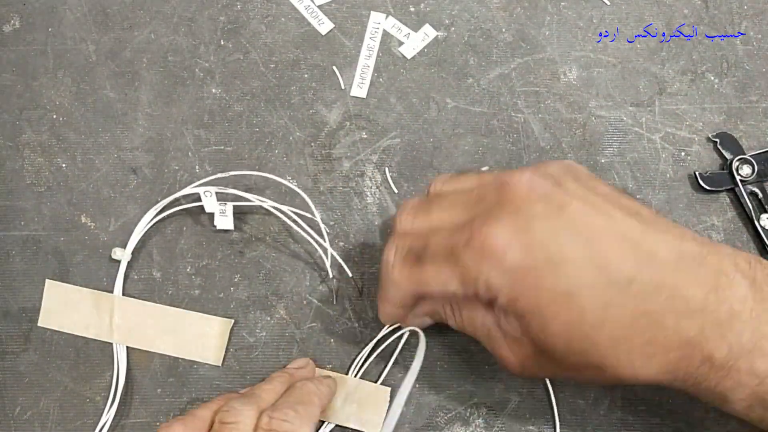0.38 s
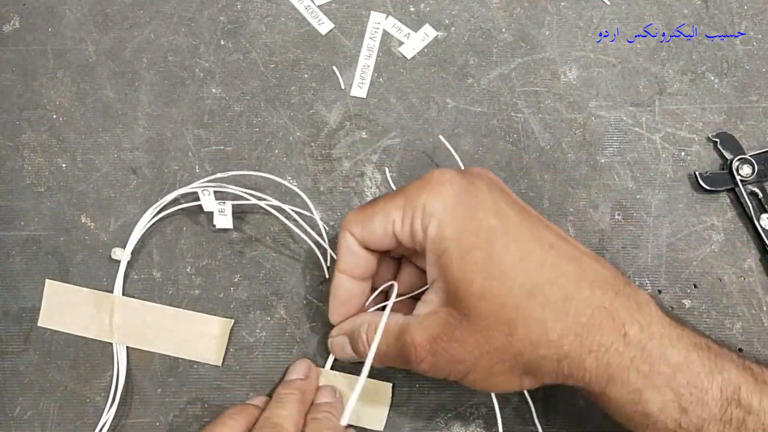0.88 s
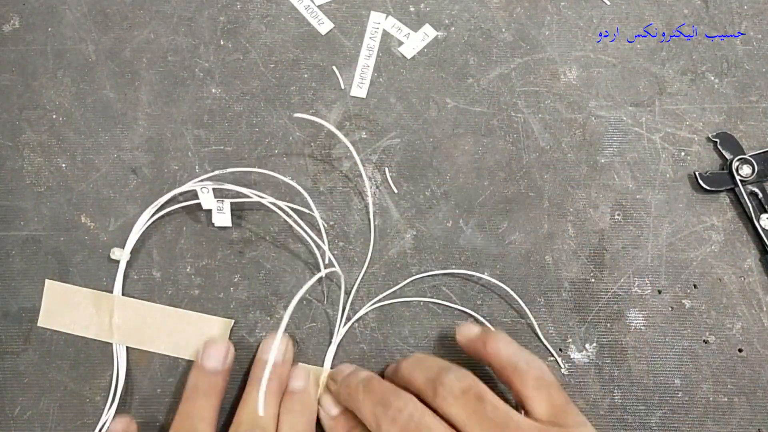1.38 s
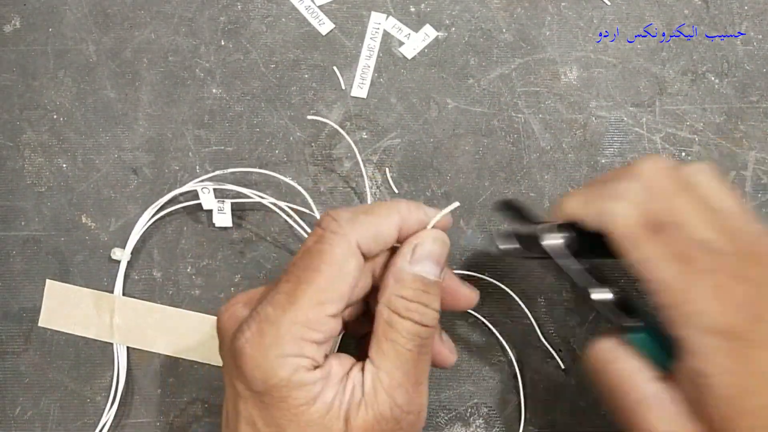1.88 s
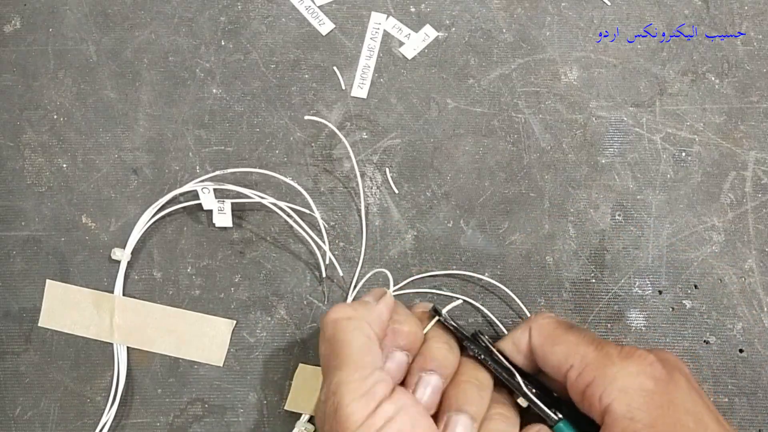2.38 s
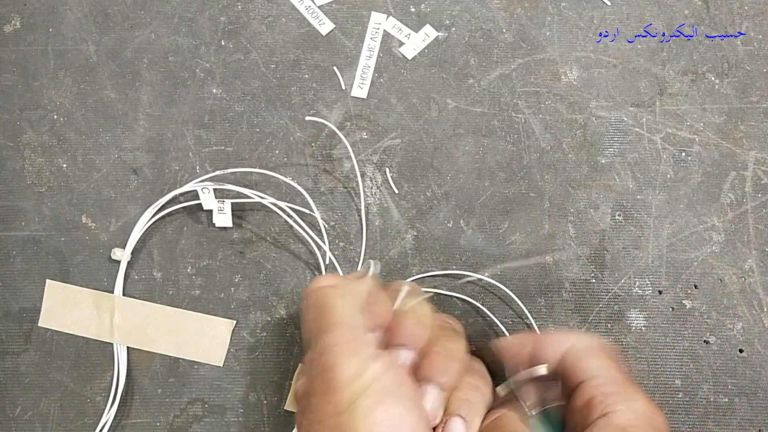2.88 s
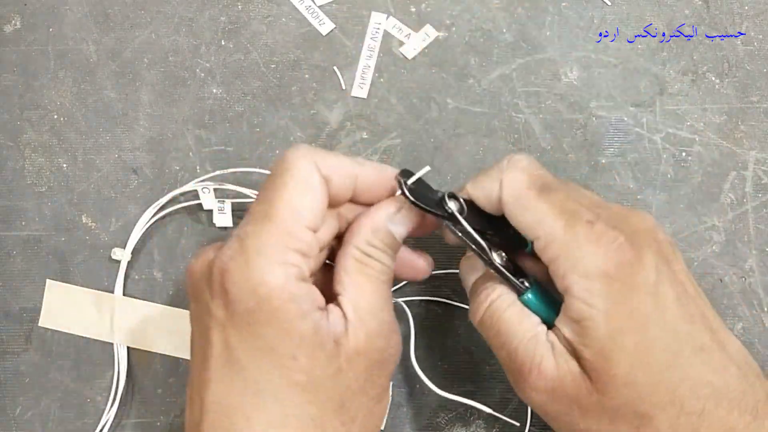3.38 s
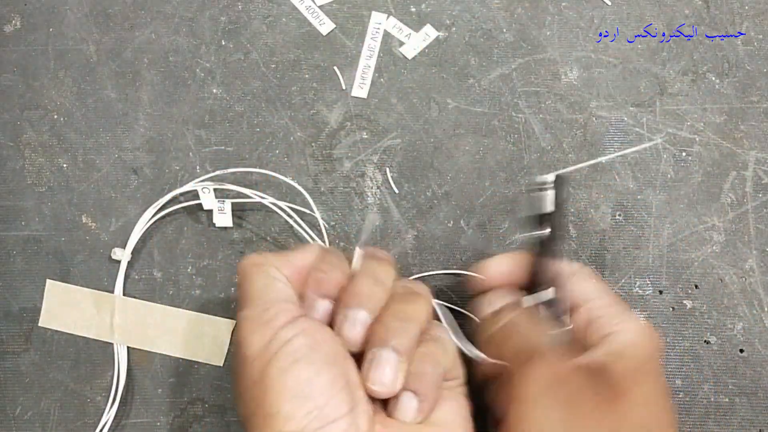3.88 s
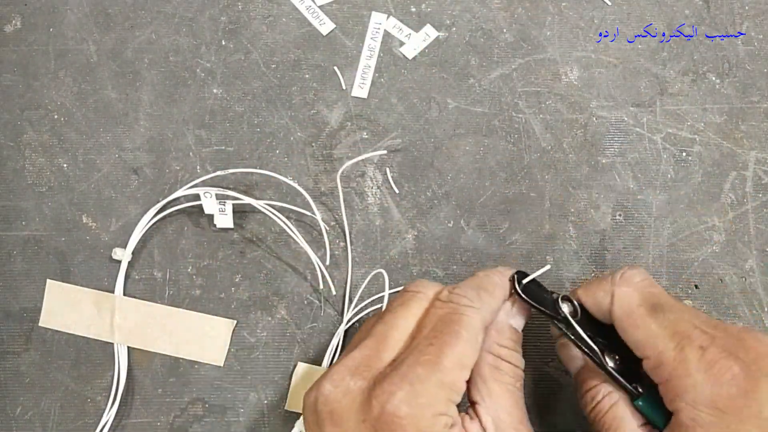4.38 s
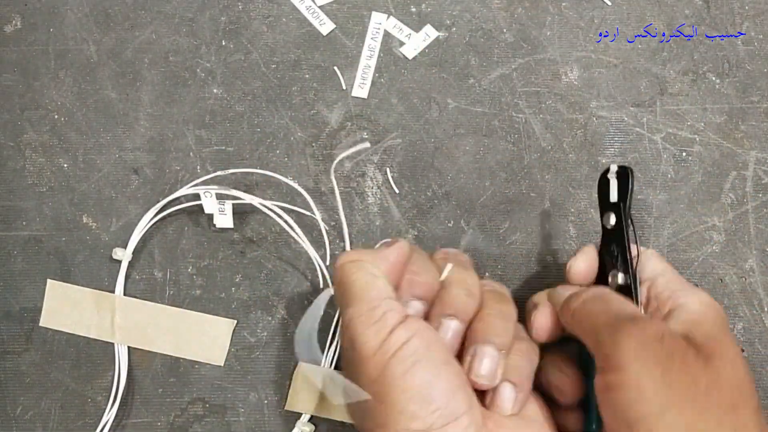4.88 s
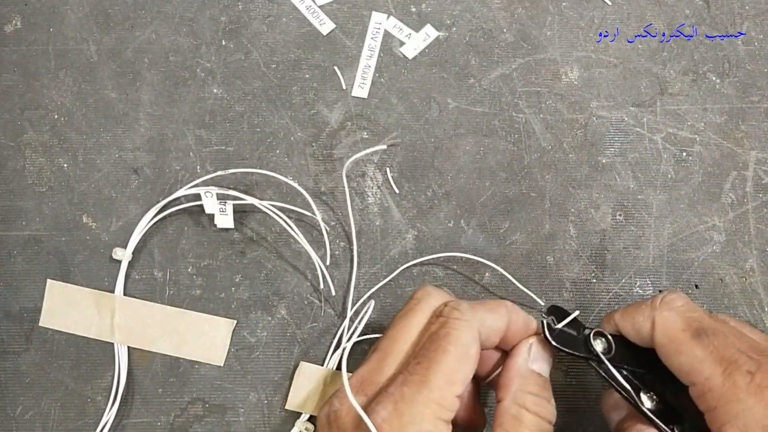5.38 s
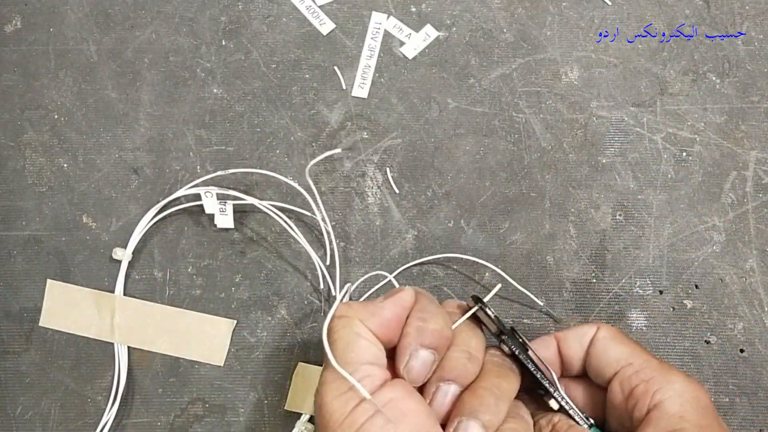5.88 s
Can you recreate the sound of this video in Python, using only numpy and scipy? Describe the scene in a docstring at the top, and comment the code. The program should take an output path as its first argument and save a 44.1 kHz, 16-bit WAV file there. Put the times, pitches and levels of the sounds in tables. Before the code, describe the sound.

A pliers-like tool clacks onto a bench, fingers rustle and tick through thin wires, then four sharp metallic snaps strip their ends.

```python
"""Stripping wires at a workbench

A hand tool is laid down on a bench; fingers sort thin coated wires, then the steel jaws strip four wire ends.
Wires tick and scrape (noise through resonances), tool and hands knock the bench top (clusters of modes), the
closed jaws drag on sleeves (fuzzy gliding lines) and tear them off (steel modes and a crack), over quiet room noise.
Everything runs faster than life: each contact is smeared into a short swell, differently in the two channels."""
import sys
import numpy as np
from scipy import signal
from scipy.fft import rfft, irfft, next_fast_len
from scipy.io import wavfile
from scipy.ndimage import uniform_filter1d, map_coordinates

SR = 44100
rng = np.random.default_rng(int(sys.argv[2]) if len(sys.argv) > 2 else 0)


def pcm_store(signal):
    """Save signal as 16-bit PCM."""
    levels = np.round(np.clip(np.atleast_2d(signal), -1, 1) * 32767)
    wavfile.write(sys.argv[1], SR, levels.astype(np.int16).T)


def voltage_ratio(decibels):
    """Convert decibels (scalar or array-like) to amplitude ratios, 20 dB per decade."""
    exponent = np.asarray(decibels, float) / 20
    return 10 ** exponent


N = 265129

# noise of the handling: t/s, wire rustle level/dB before band trims, low background level/dB before its overall trim
HANDLING = [(0.0, -57, -62), (0.18, -71, -57.5), (0.4, -60.5, -57.5), (0.7, -86, -61), (1.14, -61.5, -60.5),
            (1.4, -69.5, -53.5), (1.68, -72.5, -63.5), (1.89, -82, -57), (2.01, -75, -63),
            (2.95, -76.5, -61), (3.11, -65, -60), (3.28, -82, -62.5), (4.0, -78.5, -61.5),
            (4.5, -77.5, -63), (4.97, -67, -61.5), (5.22, -67.5, -61), (5.33, -99, -62.5), (5.6, -71, -61),
            (6.01, -74, -62)]

LEAD = SR // 20  # samples of a swell before its top
AROUND = (np.arange(3 * LEAD) - LEAD) / SR  # seconds from the top of a swell


def unit(x):
    """Scaled to rms 1."""
    return x / np.sqrt(np.mean(x ** 2) + 1e-20)


def wobble(rate):
    """A smooth random curve for each channel, rate knots a second."""
    knots = rng.standard_normal((2, int(N * rate / SR) + 4))
    position = np.arange(N) * rate / SR
    return np.array([map_coordinates(k, [position]) for k in knots])


def filtered(x, response):
    """x shaped in the spectrum by a complex response of frequency in Hz."""
    m = next_fast_len(N + SR // 2)
    return irfft(rfft(x, m) * response(np.fft.rfftfreq(m, 1 / SR)), m)[..., :N]


def resonant(x, modes):
    """x through parallel resonances of alternating sign, at unchanged power for white noise."""
    def ring(f):
        total = 0
        for k, (centre, width, db) in enumerate(modes):
            resonance = 1j * f * width / (centre * centre - f * f + 1j * f * width)
            total = total + (-1) ** k * voltage_ratio(db) * resonance
        return total

    return filtered(x, lambda f: ring(f) / np.sqrt(np.mean(abs(ring(f)) ** 2)))


def grit(rough_db, rate):
    """Uneven noise of rms 1, unrelated between the channels."""
    return unit(rng.standard_normal((2, N)) * voltage_ratio(rough_db * wobble(rate)))


def swell(db, pan_db, rise, fall, lead=1.78, tail=1.22):
    """Stereo envelope of one contact: rise and fall in seconds, lead and tail bend the slopes."""
    shape = np.where(AROUND < 0, abs(AROUND / rise) ** lead, abs(AROUND / fall) ** tail)
    return voltage_ratio(db) * np.exp(-shape / 2) * voltage_ratio([[pan_db / 2], [-pan_db / 2]])


def laid(times, pieces):
    """Sum of the pieces, each with its top at its time."""
    out = np.zeros((2, N + 4 * LEAD))
    for s, piece in zip(times, pieces):
        out[:, round(s * SR):][:, :3 * LEAD] += piece
    return out[:, LEAD:N + LEAD]


def struck(blows, modes, spread, detune, apart, apart_hz):
    """Each blow rings the modes near its centre; the channels differ more in phase towards the high modes."""
    hz, mode_db = np.repeat(np.transpose(modes), 6, axis=1)  # every mode is a cluster of close partials
    chance = rng.standard_normal((len(blows), 4, len(hz)))
    pieces = []
    for (_, db, centre_hz, pan, rise, fall), (size, phase, side, off) in zip(blows, chance):
        distance = np.log(hz / centre_hz) / spread
        weight = voltage_ratio(mode_db + 1.3 * size) * np.exp(-distance ** 2 / 2)
        near = weight > 0.03 * weight.max()
        shape = swell(db, pan, rise, fall, lead=1.97, tail=0.98)
        live = shape[0] > 1e-3 * shape[0].max()
        partial_hz = (hz * (1 + detune * off))[near, None]
        angle = 2 * np.pi * partial_hz * AROUND[live] + 9 * phase[near, None]
        shift = (side * (apart + (hz / apart_hz) ** 2))[near, None]
        rings = np.zeros_like(shape)
        rings[:, live] = weight[near] @ np.sin(angle + shift), weight[near] @ np.sin(angle - shift)
        # the blow keeps its level however the partials beat
        loudness = np.linalg.norm(rings * shape, axis=1) / np.linalg.norm(shape, axis=1)
        pieces.append(rings * shape / loudness[:, None])
    return laid([row[0] for row in blows], pieces)


def workshop():
    """Diffuse background noise that swells and sinks with the handling, a little stronger right in the bass."""
    # colour of the room: f/Hz, relative density/dB per Hz
    room = [(15, -61), (25, -23.5), (97, -2.5), (161, -5.5), (195, 1.5), (236, -10), (309, -6),
            (818, -11.5), (911, -9), (1130, -12.5), (2050, -19.5), (2550, -22), (3520, -23), (4490, -26),
            (16000, -37.5)]
    at, _, room_db = np.transpose(HANDLING)
    f, db = np.transpose(room)

    def colour(hz):
        lean_db = np.array([[-1.2], [1.2]]) / (1 + (hz / 1200) ** 2)
        return voltage_ratio(np.interp(np.log(hz + 1), np.log(f + 1), db) + lean_db)

    noise = unit(filtered(grit(0.82, 30), colour))
    return noise * voltage_ratio(np.interp(np.arange(N) / SR, at, room_db) + 1.5)


def bench():
    """Soft blows ring the board's modes as thud, knock and tap; low modes reach both channels nearly alike."""
    # the tool lands and rocks to rest: t/s, knock level/dB, knock centre f/Hz, thud/dB and tap/dB over the knock
    landing = [(.212, -45.5, 517, -6, 1), (.228, -17, 660, -12, -12.5), (.224, -40, 302, 2.5, -10),
               (.243, -30, 600, -7, -3), (.259, -36.5, 440, 0.5, 3.5), (.275, -38, 350, -5, -6)]
    # hands on the bench: t/s, knock level/dB, knock centre f/Hz, thud/dB and tap/dB over the knock
    knocks = [(.029, -63.5, 434, 13, 4), (.128, -57, 550, -8, -2), (.403, -51.5, 405, -5, -9),
              (.525, -56.5, 400, -9, -9), (.707, -63.5, 560, 6.5, -7), (1.08, -59, 484, -4, 2),
              (1.204, -47.5, 514, -1, -4.5), (1.306, -51.5, 390, -7, -6), (1.34, -46, 447, -5, 0),
              (1.375, -51.5, 855, -19, -4), (1.409, -45, 1060, -11, -3.5), (1.432, -64, 400, 11, -8),
              (1.45, -50, 590, -12, -8), (1.513, -57, 420, 3, -15), (1.572, -54.5, 500, 1.5, -12),
              (1.782, -66, 326, 17, -15), (1.815, -72, 310, 13, -13), (1.855, -60, 410, 10, -8),
              (1.872, -46, 545, -10, -14), (2.953, -59.5, 280, 9.5, -8), (2.967, -50, 440, -7, -13),
              (3.963, -57, 350, 11, 1.5), (4.137, -59.5, 448, 1, -8), (4.573, -58, 450, -0.5, -1),
              (4.925, -53, 440, -0.5, -8), (5.984, -51, 390, 4.5, -6), (6.0, -63, 473, 15, -4)]
    # light, hard taps: t/s, level/dB, centre f/Hz
    taps = [(.625, -58.5, 1270), (.764, -57, 1720), (.806, -51.5, 1790), (.865, -58, 1510),
            (3.895, -56, 1820), (5.758, -61.5, 2270), (5.833, -57, 1640), (5.941, -58, 1900)]
    # modes of the bench top: f/Hz, relative level/dB
    board = [(48, -6), (66, -8), (88, 5), (125, -1), (158, -0.5), (215, 4), (345, 1.5), (400, 1),
             (480, -0.5), (540, -1.5), (600, 0), (740, 3), (880, 2.5), (1040, 1), (1190, 0.5), (1355, 1.5),
             (1490, 1.5), (1730, 2), (1900, 0.5), (2100, 2), (2350, 1.5), (2650, -6), (3000, -21)]
    thud_ratio, tap_ratio = 0.32, 2.6  # centres of thud and tap over that of the knock
    thud_late_s = 0.00393  # the thud swells later
    rise_s, fall_s, longer_low = 0.0073, 0.008, 0.2  # of a light tap at 500 Hz; power by which low blows last longer
    tool_pan_db, hands_pan_db = 0.5, -3.5  # left over right

    def parts(rows):
        blows = []
        for s, db, hz, thud_db, tap_db in rows:
            blows.append((s + thud_late_s, db + thud_db, thud_ratio * hz))
            blows.append((s, db, hz))
            blows.append((s, db + tap_db, tap_ratio * hz))
        return blows

    def shaped(rows, pan_db, duration):
        blows = []
        for s, db, hz in rows:
            stretch = duration * (500 / hz) ** longer_low
            blows.append((s, db, hz, pan_db, stretch * rise_s, stretch * fall_s))
        return blows

    tool = shaped(parts(landing), tool_pan_db, 0.64)  # a hard contact is quicker than a hand
    hands = shaped(parts(knocks), hands_pan_db, 0.94)
    light = shaped(taps, hands_pan_db, 1)
    return struck(tool + hands + light, board, spread=0.36, detune=0.0713, apart=0.49, apart_hz=1296)


def wires():
    """Scrapes and chance ticks over a grainy rustle excite the bright wires; each rustle band flickers by itself."""
    # clear brushes and flicks: t/s, top band level/dB, body/dB and air/dB over the top band, length/s
    clear = [(.009, -51.5, -6.5, -3, .005), (0.051, -55, -4, -10, 0.016), (.136, -42, -10.5, -13, .006),
             (0.167, -33.5, -10.5, -19, 0.0055), (0.196, -48.5, -1.5, -23, 0.0095),
             (0.227, -31, 2, -12, 0.0045), (0.233, -39, -12, -1, 0.0044), (0.249, -50, 4.5, -10, .015),
             (0.305, -51.5, -8, -14, 0.011), (.343, -57.5, -5, -4, .015), (.386, -45, -7.5, -6, 0.0047),
             (0.415, -51.5, -6.5, -33, 0.0088), (0.523, -57, -3, -21, 0.012), (0.558, -51, -14, -8, 0.0043),
             (0.584, -55.5, -3.5, -19, 0.0092), (0.622, -55, 5.5, -25, 0.0092),
             (0.694, -63.5, 4, -0.5, 0.019), (.763, -62, 1, -10, 0.0076), (.799, -47, -4, 3.5, 0.005),
             (0.811, -46, -2.5, -2, 0.0082), (0.826, -50, 0, -2, 0.0057), (0.874, -59, 1, -10, 0.018),
             (0.936, -50, -3, 0.5, 0.0048), (0.986, -55.5, -12, -1, 0.0027), (1.09, -66, 5, -1, .03),
             (1.169, -49.5, -2.5, -5.5, 0.0047), (1.208, -60.5, 5.5, -5, 0.0086),
             (1.308, -58, 3, -4, 0.003), (1.362, -55, 0.5, -6, .014), (1.411, -54.5, 3, -11, .013),
             (1.446, -52.5, -5, -7, .009), (1.482, -55, -5, -7, .007), (1.512, -57, -5, -7, 0.0063),
             (1.553, -58.5, -4, -5, 0.014), (1.618, -59.5, -8, -3, 0.013), (1.65, -52, -10, -3, 0.0034),
             (1.856, -59.5, -1.5, -4.5, 0.03), (2.078, -54.5, -2.5, -2.5, 0.0038),
             (2.137, -63, -6, -11, 0.0099), (2.343, -63.5, -6, -19, 0.006), (2.685, -67.5, -4, -9, 0.038),
             (3.072, -52, -21, -9, 0.0049), (3.095, -51, -4, -9.5, 0.0038),
             (3.199, -60.5, -11, -27, 0.0066), (3.264, -54, -8.5, -9, 0.005), (3.722, -63.5, -1, -7, 0.011),
             (3.898, -68.5, 6, -8, 0.0042), (3.987, -51, -10, -16, 0.011), (4.026, -56, -4.5, -4, 0.012),
             (4.137, -57, -3, -7, 0.0068), (4.184, -59.5, -16, -20, 0.0074), (4.252, -62.5, -6, -9, 0.016),
             (4.485, -62.5, -8, -11, 0.0059), (4.568, -50.5, -11, -9, .005), (4.585, -60, -8, -8, .012),
             (4.639, -61.5, -5, -10, 0.015), (4.734, -50, -13, -15, 0.0043), (4.745, -35, -26, -25, 0.0029),
             (4.759, -62, -10, -17, .01), (5.001, -49, -10.5, -18, .005), (5.074, -51, -5, -5, .007),
             (5.138, -57.5, -25, -4, 0.005), (5.167, -53, -25, -6, .007), (5.221, -63, -1, -5, 0.017),
             (5.641, -62, -4.5, -10, 0.016), (5.725, -67, -10, -14, 0.0099), (5.756, -71, 10, -10, 0.003),
             (5.832, -69, 10, -12, 0.0046)]
    # resonances of the three bands: f/Hz, width/Hz, relative level/dB
    wire_top = [(6700, 1090, -0.5), (7390, 603, 4.5), (8330, 1430, -8)]
    wire_body = [(2500, 2100, -6.5), (3500, 1170, 3), (4840, 1230, -0.5)]
    wire_air = [(9700, 6400, 0.0018), (15300, 7500, 0)]
    rise_ratio = 1.08  # rise over length
    tick_count, tick_db, tick_spread_db, tick_s = 40, 1.5, 3, 0.0055  # count, dB over the rustle, scatter, length

    at, busy_db, _ = np.transpose(HANDLING)
    rustle_db = np.interp(np.arange(N) / SR, at, busy_db) + 3.55 * wobble(55)[0]
    when = rng.uniform(0, N / SR, tick_count)
    luck = rng.standard_normal((tick_count, 3))
    ticks = []
    for s, (a, b, c) in zip(when, luck):
        level_db = np.interp(s, at, busy_db) + tick_db + tick_spread_db * a
        ticks.append((s, level_db, -5 + 3 * b, -8 + 3 * c, tick_s))
    s, db, body_db, air_db, length = np.transpose(clear + ticks)
    pan_db = rng.normal(0, 0.92, len(s))

    out = 0
    for modes, band_db, under_db in (wire_top, 0, -1.5), (wire_body, body_db, -7), (wire_air, air_db, -8):
        contacts = zip(db + band_db, pan_db, rise_ratio * length, length)
        scrape_power = laid(s, [swell(*row) ** 2 for row in contacts])
        rustle = voltage_ratio(rustle_db + under_db + 1.0 * wobble(36)[0])
        envelope = np.sqrt(scrape_power + rustle ** 2)
        out = out + resonant(envelope * grit(2.87, 600), modes)
    return out


def squeak(hz, width_hz):
    """A fuzzy line of rms 1 that follows a pitch curve: slow noise on a sine and a cosine."""
    fuzz = filtered(rng.standard_normal((2, 2, N)), lambda f: 1 / (1 + (f / width_hz) ** 2))
    angle = 2 * np.pi * np.cumsum(hz) / SR
    return unit(fuzz[0] * np.cos(angle) + fuzz[1] * np.sin(angle))


def drag():
    """The closed jaws slide on a sleeve: two fuzzy lines that swell, sag in pitch and stick unevenly."""
    # strokes: loudest t/s, build-up/s, release/s, lower line level/dB, lower line f/Hz, upper line/dB over the lower
    strokes = [(2.325, 0.15, 0.04, -61.5, 3480, -10), (2.925, 0.088, .012, -65.5, 3500, -5),
               (3.03, 0.055, .17, -67, 3605, -6), (4.03, 0.067, .14, -67.5, 3596, -12),
               (4.731, .12, 0.013, -62.5, 3400, -8), (5.24, .07, .08, -67, 3520, -1),
               (5.965, 0.16, .012, -61, 3470, -0.5)]
    edge_db, sag_hz_per_s, stick_db = -9, 800, 2.5  # ends under the top, lower line's pitch sag, unevenness
    t = np.arange(N) / SR
    level, hz = 0, strokes[0][-2]
    for top, build, release, db, top_hz, upper_db in strokes:
        since = t - top
        stroke = (since > -build) * (since < release)
        edge = np.where(since < 0, -since / build, since / release)
        level = level + stroke * voltage_ratio(db + edge_db * edge + [[0], [upper_db]])
        hz = np.where(stroke, top_hz - sag_hz_per_s * since, hz)
    low, high = uniform_filter1d(level, size=600) * voltage_ratio(stick_db * wobble(40))
    return low * squeak(hz, width_hz=170) + high * squeak(1.27 * hz, width_hz=390)


def jaws():
    """Each sleeve tear or clack shakes the steel in a low, a middle and a high ring and cracks in the treble."""
    # tears and clacks: t/s, middle ring level/dB, middle ring f/Hz, low ring/dB over it, left over right/dB, length/s
    snaps = [(2.938, -36, 3700, 2.5, -3.5, 0.0051), (2.954, -51.5, 3460, 2, 3, .009),
             (3.933, -45.5, 4580, 4, 4, .005), (3.95, -58, 3200, 2, 0, .012),
             (4.912, -46, 4500, -6.5, 0.5, 0.0069), (4.924, -50.5, 4270, -5, -2, .006),
             (5.978, -38, 4240, -16.5, -1, 0.0022), (5.99, -54, 3460, -20, 2, 0.0028),
             (6, -39, 3350, -22, 12, 0.0021)]
    # modes of the steel jaws: f/Hz, relative level/dB
    steel_modes = [(1400, -6), (1670, -3.5), (1880, 1), (2150, -5), (2450, -2), (2800, -17), (3150, -1.5),
                   (3500, 3), (3800, -3.5), (4300, -6), (4800, -4), (5500, -0.5), (6250, 3), (6600, 5),
                   (7000, 7), (7500, 5.5), (8300, 14)]
    # resonances of the crack: f/Hz, width/Hz, relative level/dB
    crackle = [(1200, 800, 3.5), (2900, 2600, 6), (5300, 2130, 4), (8900, 930, -1.2), (14500, 2900, -2.5)]
    low_hz, high_hz, high_db = 2040, 6630, -2.5  # ring centres; high ring over the middle one
    lean_db = 3.5  # the high ring leans left, the low one right
    rise_s, low_longer, crack_longer = 0.0034, 1.1, 1.56  # ring rise; falls of low ring and crack over the length
    crack_db = -3  # over the middle ring

    rings, cracks = [], []
    for s, db, hz, low_db, pan, length in snaps:
        rings.append((s, db + low_db, low_hz, pan - lean_db, rise_s, low_longer * length))
        rings.append((s, db, hz, pan, rise_s, length))
        rings.append((s, db + high_db, high_hz, pan + lean_db, rise_s, length))
        cracks.append(swell(db + crack_db, pan, 0.0018, crack_longer * length, lead=1.2))
    steel = struck(rings, steel_modes, spread=0.15, detune=0.036, apart=0.95, apart_hz=3040)
    crack_envelope = laid([row[0] for row in snaps], cracks)
    return steel + resonant(crack_envelope * grit(1.3, 250), crackle)


def scene():
    """All sources summed in stereo."""
    return workshop() + bench() + wires() + drag() + jaws()


def top_cut(x):
    """Nothing passes above the cut-off."""
    return signal.sosfilt(signal.butter(12, 16480, fs=SR, output="sos"), x)


def record(dry):
    """The finished mix, steeply cut above 15850 Hz."""
    mix = filtered(dry, lambda hz: hz < 15850)
    return top_cut(mix)


dry = scene()
out = record(dry)
pcm_store(out)
```